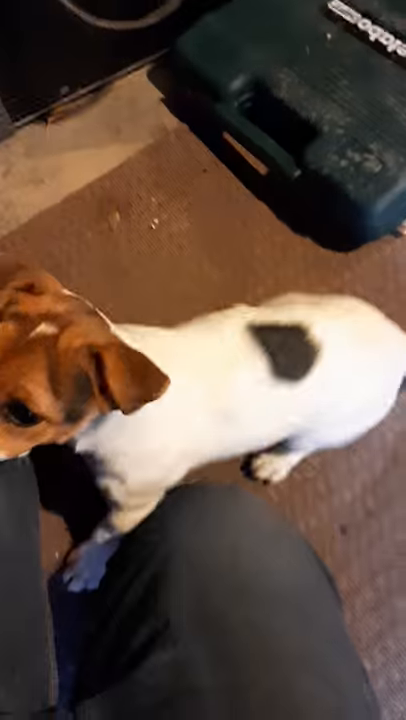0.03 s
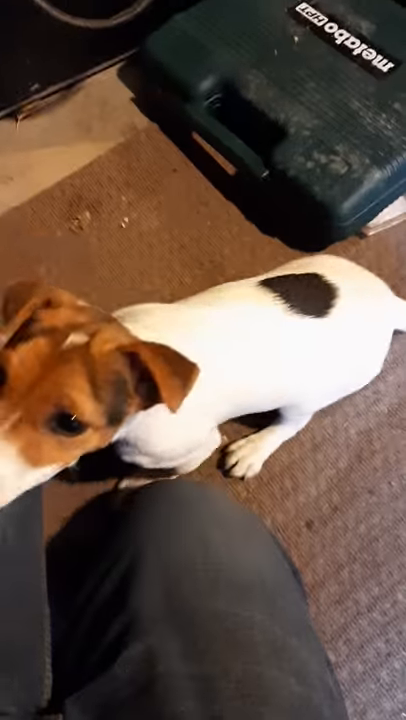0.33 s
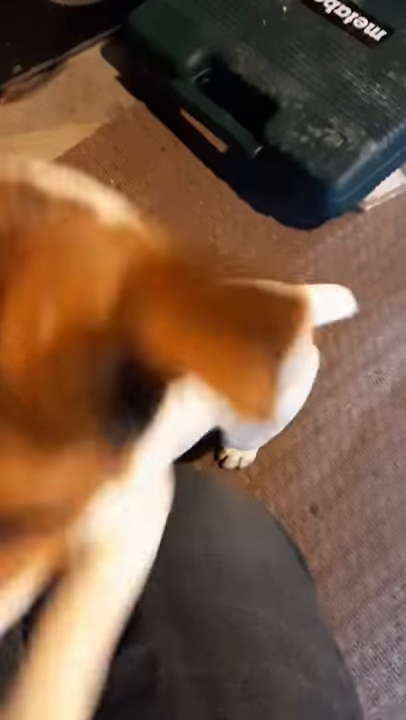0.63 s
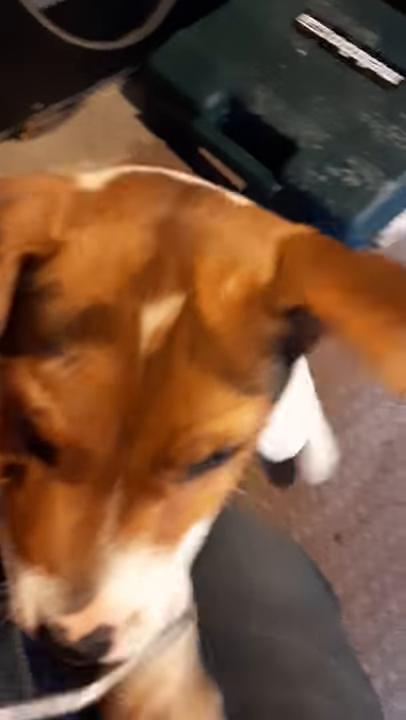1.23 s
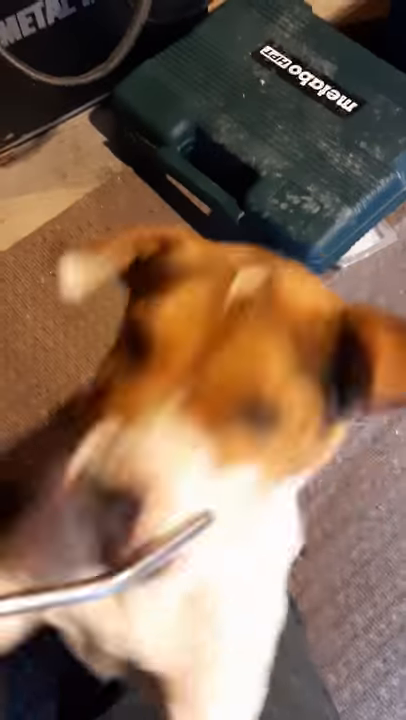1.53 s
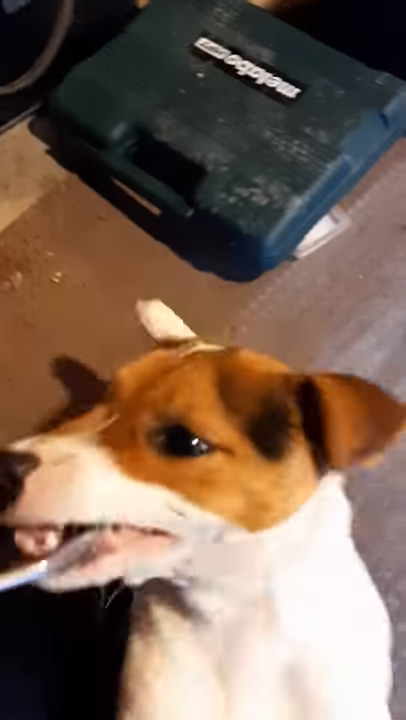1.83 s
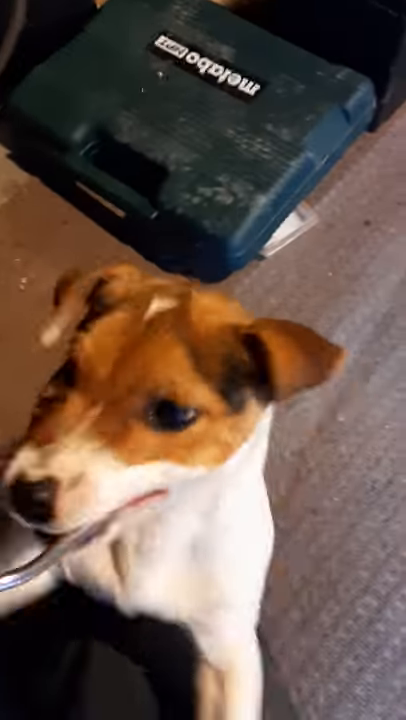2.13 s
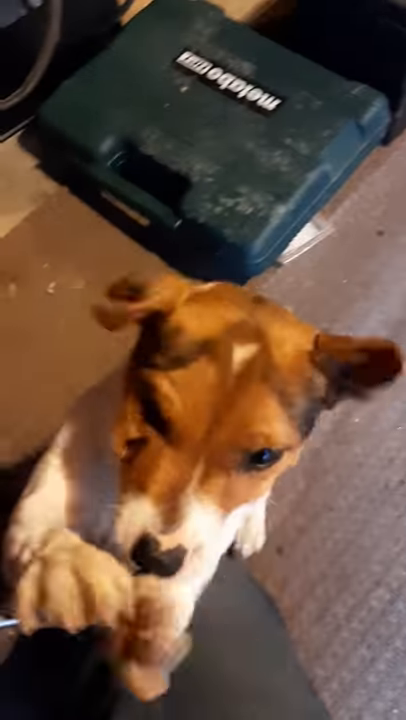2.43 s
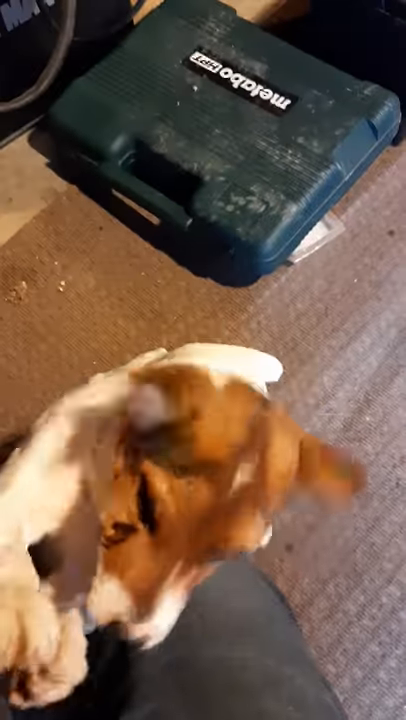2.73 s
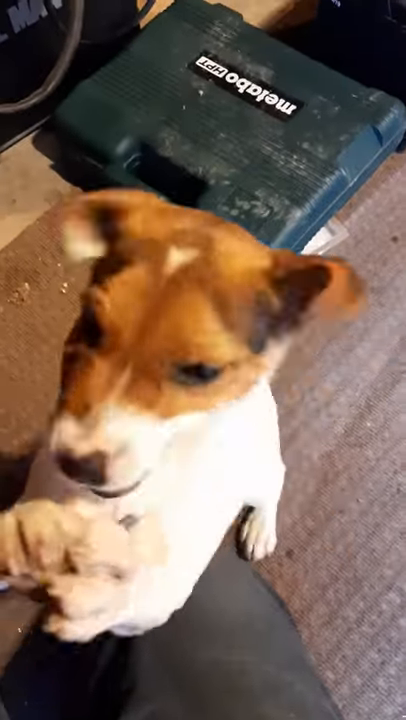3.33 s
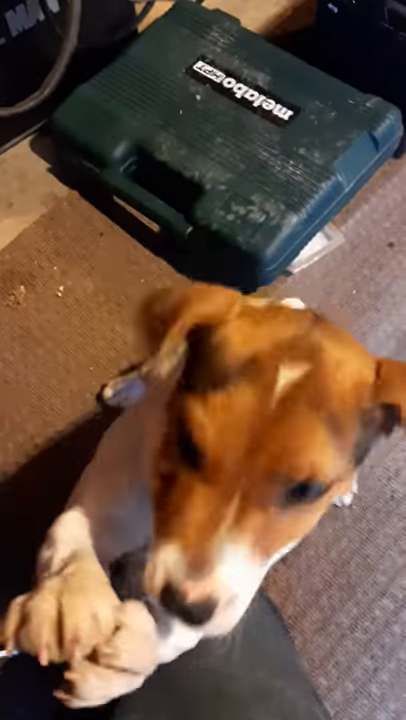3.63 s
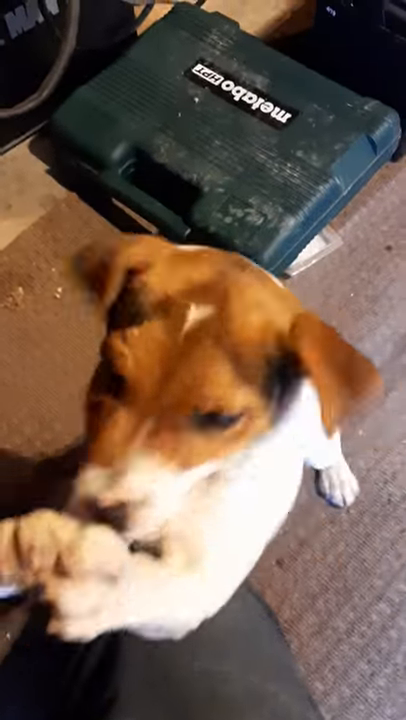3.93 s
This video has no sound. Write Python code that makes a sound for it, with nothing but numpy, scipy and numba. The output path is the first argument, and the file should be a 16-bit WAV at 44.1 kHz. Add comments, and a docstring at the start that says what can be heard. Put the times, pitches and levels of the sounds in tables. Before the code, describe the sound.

In a workshop, an air nozzle opens with a spurt and hisses close to the microphone. The hiss grows, then flutters and spits as it strikes a dog's muzzle and paws, throwing short puffs of wind onto the microphone.

```python
"""A workshop, close to a phone: compressed air hisses from a blow gun while a dog snaps at the jet.
The valve opens with a spurt; the free jet rings the gun's thin tube and swells as the trigger is squeezed.
Then it splashes on muzzle and paws, blows the open mouth like a bottle, spatters saliva and is thrown
across the two microphone ports in short blasts. Nearby surfaces throw the hiss back over a faint rush."""
import sys
import numpy as np
from scipy import signal
from scipy.fft import rfft, irfft
from scipy.io import wavfile
from scipy.ndimage import uniform_filter1d
from numba import njit

SR = 44100
rng = np.random.default_rng(int(sys.argv[2]) if len(sys.argv) > 2 else 0)


def inscribe(sig):
    """Save sig as 16-bit PCM at rate SR to the path in sys.argv[1].

    A 1-D sig is mono; a 2-D sig holds one channel per row.
    Samples are clipped to [-1, 1] before scaling.
    """
    pcm = np.round(np.clip(np.atleast_2d(sig).T, -1, 1) * 32767)
    wavfile.write(sys.argv[1], SR, pcm.astype(np.int16))


N = 176400

# Ride of the free jet: time_s, level_db, treble_db, tube_ring_db
JET_RIDE = [(.07,-43.5,-2,-2),(.155,-53,-6,7),(.2,-43.5,0,-4.5),(.29,-48,3,-5.5),(.52,-47.5,1,-4),(.68,-43,-1,-6),(.77,-45.5,-8,6.5),(.81,-37.5,-3.5,1),(.99,-34.5,-8,-1.5),(1.08,-32,-5,2),(1.22,-30,-0.5,-0.5),(1.4,-30.5,4,2),(1.52,-24.5,-2,3.5),(1.6,-28.5,12.5,-12),(1.7,-42,6,7.5),(2.25,-38.5,8,0),(2.75,-42,6,-1),(3.3,-37.5,6.5,2),(4.0,-53.5,28,0.5)]
# Resonances of the tube: pitch_hz, width_hz, running_db, spurt_db
TUBE_MODES = [(1516,127,4,-17),(2620,210,2,-8.5),(3750,140,6,7),(4925,250,5.5,-1.5),(5860,190,1.5,1),(6900,190,3,-1.5),(8050,200,0.5,-31),(9380,200,-4,-20),(10600,270,-7.5,-17),(11830,310,-4,-15),(12500,430,2,-22),(14040,530,3.5,-22),(14930,560,3.5,-23)]
# Rush of the jet between those resonances: frequency_hz, gain_db
JET_EQ = [(40,-27.5),(350,-20),(750,-11.5),(1100,-10.5),(1900,-7),(3200,-5.5),(5300,-1),(7700,-3),(8700,-29),(10000,-12),(11200,-1),(12500,-40),(15700,-15)]
# Hollow puff of the opening valve: pitch_hz, width_hz, gain_db
VALVE_PUFF = [(388,170,-19)]
# Ride of the jet striking the dog: time_s, relative_level_db, treble_db
STRIKE_RIDE = [(1.46,-56,3),(1.54,-36,-5),(1.58,-30,4),(1.615,-24.5,6),(1.645,-17.5,0.5),(1.672,-36,7.5),(1.755,-31,4.5),(1.782,-23.5,-4),(1.795,-31,-8),(1.9,-26,4.5),(2.0,-22.5,-7),(2.04,-28,3.5),(2.18,-26.5,4.5),(2.26,-33,-2),(2.32,-28,-2),(2.365,-25,4),(2.39,-28,-6),(2.46,-32,7),(2.5,-31.5,3.5),(2.594,-32,1),(2.6,-25,6.5),(2.62,-28.5,9.5),(2.655,-31,-3),(2.68,-30,5.5),(2.768,-32,4.5),(2.79,-24.5,8.5),(2.818,-24,4),(2.828,-32,2),(2.838,-31,-2),(2.843,-23.5,7),(2.9,-27,10.5),(2.97,-25.5,3.5),(3.025,-23.5,7),(3.085,-30,3.5),(3.125,-27.5,7),(3.187,-28,5),(3.2,-23,0),(3.23,-23,2),(3.275,-25.5,1),(3.29,-26,1),(3.34,-33.5,0.5),(3.418,-25,-5),(3.435,-23,3),(3.495,-24,1),(3.56,-27.5,-7),(3.65,-28,2.5),(3.695,-29,1),(3.74,-25.5,5.5),(3.79,-26,3),(3.85,-24,0),(3.895,-29.5,3),(4.0,-23,-16)]
# Air splashing off the dog, as each port hears it: frequency_hz, left_db, right_db
SPLASH_EQ = [(30,-1,-29),(90,-12,-9),(404,-7,-7.5),(900,-3,0.5),(1840,3.5,3),(3020,-0.5,0.5),(3980,2.5,4.5),(4550,0,-0.5),(5700,4,6),(6400,-0.5,1.5),(7890,4.5,6),(8210,-15.5,-1),(9700,-19,1),(11000,4.5,5),(12400,-8.5,4.5),(13500,-5.5,4),(15900,-0.5,9.5)]
# Mouth cavity following the jaw: time_s, pitch_hz, level_db
MOUTH_RIDE = [(1.5,1610,-66),(1.6,1700,-59),(1.645,1830,-32),(1.68,1800,-62),(1.805,1410,-46),(1.825,1190,-31),(1.85,1065,-23.5),(1.91,910,-33),(1.95,870,-28.5),(1.98,916,-21),(2.015,930,-30),(2.06,940,-35),(2.1,1990,-55),(2.19,2060,-23),(2.27,1950,-47),(2.33,2130,-27),(2.39,1810,-47),(2.44,1320,-34),(2.55,1670,-43),(2.66,1480,-36.5),(2.77,1780,-38.5),(2.8,1630,-25),(2.87,1700,-36.5),(2.93,1780,-30.5),(3.05,1540,-36.5),(3.108,1660,-20),(3.13,1600,-38),(3.28,1740,-37),(3.34,1460,-46),(3.39,1580,-26),(3.5,1650,-46),(3.69,1860,-36.5),(3.78,1420,-35),(3.815,1150,-25),(3.86,1540,-33),(3.92,1880,-42),(4.0,1550,-38)]
# Mouth resonances with the nozzle between the jaws: pitch_hz, width_hz, gain_db
BITE_MODES = [(426,230,-6.5),(2070,220,3),(3570,650,6.5),(4760,390,2),(5860,770,3),(7730,650,6),(11000,610,-0.5),(13700,970,3.5)]
# Flaring bands of hiss: peak_s, half_length_s, pitch_hz, width_hz, level_db
HISS_FLARES = [(1.1,0.081,4900,450,-38),(1.404,.06,15100,450,-34),(1.335,.04,2560,160,-41),(1.477,0.03,3660,406,-33),(1.534,0.022,2840,900,-29.5),(1.542,0.045,12300,1000,-34),(1.626,0.018,2170,695,-30.5),(1.625,0.038,6140,1500,-24.5),(1.72,0.039,5950,1500,-34),(1.804,.018,7200,700,-24),(1.793,0.0099,12500,2000,-29),(2.168,.035,7800,500,-29.5),(2.175,0.028,3260,400,-26),(2.3,0.01,10000,900,-30.5),(2.323,0.037,5040,2200,-28),(2.482,0.042,5470,500,-35),(2.92,0.036,5440,1200,-29.5),(2.962,0.038,9700,1100,-24.5),(2.995,0.05,7400,600,-24),(2.99,.11,1970,278,-37),(3.05,0.25,1540,90,-38.5),(3.102,0.014,1900,900,-26.5),(3.127,0.019,6960,3500,-24),(3.276,.018,14900,800,-22),(3.391,.03,1610,450,-32),(3.435,0.0091,5220,450,-20),(3.453,0.011,7050,700,-27),(3.56,0.039,11800,1100,-30.5),(3.663,.04,14100,1100,-29),(3.743,.025,12000,800,-31),(3.85,0.032,14200,1400,-22),(3.974,0.06,13500,2300,-25.5)]
# Tooth or claw cutting the jet: start_s, level_db
JET_CUTS = [(1.656,-18),(1.7605,-11.5),(1.999,-16),(2.049,-17),(2.239,-18.5),(2.598,-27),(2.651,-26),(2.68,-24),(2.924,-28),(3.197,-21),(3.431,-22),(3.525,-15),(3.58,-15.5),(3.744,-17),(3.85,-16)]
# Tone of a cut: frequency_hz, gain_db
CUT_EQ = [(200,-15),(1200,4),(4000,1),(7500,-13),(9000,-11),(12000,-3),(15500,-1)]
# Blasts across the ports: start_s, half_length_s, left_db, right_db, relative_push_db
PORT_BLASTS = [(1.638,0.005,-22,-23,-2),(1.656,0.0035,-24.5,-25.5,5),(1.759,0.004,-17.5,-17.5,-4),(1.773,0.006,-20,-28.5,3.5),(2.15,0.0054,-35,-15.5,6),(2.237,0.0059,-29,-20,-3),(2.593,0.0057,-45,-32,2),(2.637,0.026,-26,-37.5,-16),(2.783,0.015,-22.5,-33,-24),(2.846,0.019,-23,-29,-17),(2.902,0.0026,-34,-10,-0.5),(3.194,0.0091,-26.5,-34,-14),(3.272,0.0068,-18.5,-21,-12),(3.471,0.0076,-24,-37,-12),(3.477,0.0073,-19,-36,-14),(3.523,0.0092,-24.5,-19,-18),(3.577,0.0069,-16,-23,-8),(3.708,0.024,-27,-35,-12),(3.745,0.0099,-30,-14.5,-5),(3.846,0.009,-19,-12,-10),(3.863,0.015,-34,-27.5,-10),(3.987,.012,-27,-17.5,-16)]
# Turbulence on a port: frequency_hz, gain_db
BUFFET_EQ = [(20,-6),(60,-0.5),(130,1.5),(220,0),(400,-5.5),(700,-5),(1500,-12),(3000,-11),(6000,-33),(16000,-55)]
# Spent air round the phone: frequency_hz, gain_db
WASH_EQ = [(25,-14),(70,0),(140,-1),(220,-0.5),(380,-7),(600,-5),(1500,-12),(8000,-50)]
# Low draughts on the right port: peak_s, half_length_s, level_db
DRAUGHT_SWELLS = [(.208,.012,-62),(0.773,0.065,-41.5),(0.85,0.081,-40.5),(1.135,0.013,-54),(1.565,.02,-41),(3.93,0.054,-36.5)]
# Rumble of a draught: frequency_hz, gain_db
DRAUGHT_EQ = [(20,-9),(45,-7),(65,6),(110,-10.5),(250,-23.5),(800,-22.5),(4000,-35)]
# Body of a soft knock: pitch_hz, width_hz, gain_db
KNOCK_MODES = [(150,130,2),(450,250,-8),(990,290,4)]
# Steady room tone: frequency_hz, gain_db
ROOM_EQ = [(30,4),(70,6),(130,-4),(260,-1),(700,-12),(1100,-1.5),(1500,-2.5),(2200,-6),(5000,-16),(16000,-37)]

OPEN_S, OPEN_RISE_S = 0.068, 0.0028
SPURT_DB, SPURT_HOLD_S, SPURT_DECAY_S = -36, 0.077, 0.067
JET_LOW_PAN_DB, JET_LOW_HZ = -8, 1210
BITE_START_S, BITE_END_S, BITE_RAMP_S, BITE_DB = 1.77, 2.23, 0.017, -22
DROPS_PER_S, DROP_DECAY_S, CUT_DECAY_S = 45, 0.00037, 0.0017
PUSH_HZ, PUSH_DECAY_S, BLAST_RISE_S = 68, 0.0066, 0.00045
KNOCK_S, KNOCK_DECAY_S = 0.18, 0.025
WALLS_DB, WALLS_T60_S, WALLS_DULL_HZ = -8, 0.09, 8000
PORT_SHARE, PORT_SHARE_HZ = 0.39, 8500
TREBLE_HZ, TOP_HZ = 8660, 15780


def free_jet():
    """The running jet rings the thin tube, with a broad rush between the resonances."""
    ring_eq, rush_eq = peaks(np.array(TUBE_MODES)[:, :3]), slope(JET_EQ)
    ring = flutter(colour(air(), ring_eq), depth_db=3.1, rate_hz=11.57, bands=24)
    ring *= undb(ride(JET_RIDE, 3))
    low_pan = pan(JET_LOW_PAN_DB / (1 + (freqs() / JET_LOW_HZ) ** 2))
    rush = colour(air(), rush_eq * low_pan)
    ring_share = np.sum(ring_eq ** 2) / np.sum(ring_eq ** 2 + rush_eq ** 2)
    jet = np.sqrt(ring_share) * ring + np.sqrt(1 - ring_share) * rush
    return brighten(jet, ride(JET_RIDE, 2)) * undb(ride(JET_RIDE, 1) + 0.68 * wobble(30.4))


def blow_gun():
    """The valve opens: a hollow spurt rings the tube and dies away while the jet runs on."""
    age = times() - OPEN_S
    jet = free_jet()
    spurt_modes = np.array(TUBE_MODES)[:, [0, 1, 3]]
    spurt = colour(air(), peaks(spurt_modes) + peaks(VALVE_PUFF))
    spurt *= undb(SPURT_DB) * np.exp(-np.maximum(age - SPURT_HOLD_S, 0) / SPURT_DECAY_S)
    return (jet + spurt) * np.clip(age / OPEN_RISE_S, 0, 1) * pan(-2.5)


def strike_level():
    """How hard the jet hits the dog, as a gain that fades in at first contact."""
    fade_in = np.clip((times() - STRIKE_RIDE[0][0]) / 0.03, 0, 1)
    return undb(ride(STRIKE_RIDE, 1) + 2) * fade_in


def splash():
    """Air breaks on muzzle and paws; its bands flutter as the head moves."""
    hiss = colour(air(), np.array([slope(SPLASH_EQ, 1), slope(SPLASH_EQ, 2)]))
    hiss = flutter(hiss, depth_db=3.33, rate_hz=26, bands=30)
    return brighten(hiss, ride(STRIKE_RIDE, 2)) * strike_level() * undb(1.5 * wobble(130))


def mouth():
    """The jet blows the mouth like a bottle, its pitch following the jaw; a full bite adds resonances."""
    t = times()
    pitch_hz, width_hz = ride(MOUTH_RIDE, 1) * (1 + 0.042 * wobble(50)), 460.0
    cavity = np.array([resonate(resonate(port, pitch_hz, width_hz), pitch_hz, width_hz) for port in air()])
    cavity = unit(cavity) * undb(ride(MOUTH_RIDE, 2) + 1.94 * wobble(90)) * (t > MOUTH_RIDE[0][0])
    held = np.clip(np.minimum(t - BITE_START_S, BITE_END_S - t) / BITE_RAMP_S, 0, 1)
    bite = colour(air(), peaks(BITE_MODES)) * held * undb(BITE_DB + 1.06 * wobble(60))
    return cavity * pan(-4.5) + bite * pan(-2)


def flares():
    """Bands of hiss flare as the jet rings the tube or catches lip, tooth or claw."""
    turbulence = air()
    shrill = sum(colour(turbulence, peaks([(hz, width, 0)])) * swell(peak_s, half_s) * undb(db)
                 for peak_s, half_s, hz, width, db in HISS_FLARES)
    return shrill * undb(1.9 * wobble(120)) * pan(-6)


def saliva():
    """Droplets of saliva tick in the jet, louder the harder it strikes."""
    drops = rng.random(N) < DROPS_PER_S / SR
    clicks = drops * undb(-8 * np.minimum(rng.exponential(size=N), 3))
    decay = np.exp(-np.arange(256) / SR / DROP_DECAY_S)
    grains = rng.standard_normal((2, len(decay))) * decay
    ticks = np.array([signal.fftconvolve(clicks, grain)[:N] for grain in grains])
    return colour(ticks, peaks([(3600, 2200, 0)])) * undb(-23.5) * strike_level()


def jet_cuts():
    """Tooth or claw cuts the jet for an instant, and it spits sharply."""
    t = times()
    bursts = sum(undb(db) * (t >= at) * np.exp(-abs(t - at) / CUT_DECAY_S) for at, db in JET_CUTS)
    return colour(air(), slope(CUT_EQ)) * bursts * pan(-5)


def blasts():
    """Deflected air hits each port: a low push of pressure and a spiky burst of turbulence."""
    ports = np.zeros((2, N))
    buffet = colour(rng.standard_normal((2, N)), slope(BUFFET_EQ))
    spikes = undb(5.5 * np.clip(wobble(450), -2, 1))
    buffet = unit(buffet * spikes) * undb(-3)
    for start_s, half_s, left_db, right_db, push_db in PORT_BLASTS:
        age = np.maximum(times() - start_s, 0)
        push = -np.sin(2 * np.pi * PUSH_HZ * age) * np.exp(-age / PUSH_DECAY_S) * undb(push_db)
        burst = np.minimum(age / BLAST_RISE_S, 1) * np.exp(-(age / (2 * half_s)) ** 1.74)
        ports += undb([[left_db], [right_db]]) * (buffet * burst + push)
    return ports


def wash():
    """Spent air eddies round the phone whenever the jet hits the dog."""
    eddies = colour(rng.standard_normal((2, N)), slope(WASH_EQ))
    gusts = undb(1.5 * np.array([wobble(45), wobble(45)]))
    return eddies * gusts * strike_level() * undb(-23)


def draughts():
    """Slower air rumbles on the right port and barely touches the left."""
    rumble = colour(rng.standard_normal((2, N)), slope(DRAUGHT_EQ))
    swells = sum(undb(db) * swell(peak_s, half_s) for peak_s, half_s, db in DRAUGHT_SWELLS)
    return rumble * swells * undb([[-24], [0]])


def knock():
    """A soft, dull knock near the phone."""
    age = times() - KNOCK_S
    decay = (age > 0) * np.exp(-abs(age) / KNOCK_DECAY_S)
    return colour(air(), peaks(KNOCK_MODES)) * decay * undb(-56) * pan(-12)


def walls(x):
    """Floor, knees and benches close by throw the hiss back, duller, and differently to each port."""
    age = times()[:SR // 5]
    tail = rng.standard_normal((2, len(age))) * undb(-60 * age / WALLS_T60_S) * (age > 0.003)
    tail *= undb(WALLS_DB) / np.linalg.norm(tail, axis=1, keepdims=True)
    tail = signal.sosfilt(signal.butter(1, WALLS_DULL_HZ, fs=SR, output="sos"), tail)
    return (x + signal.fftconvolve(x, tail, axes=1)[:, :N]) / np.hypot(1, undb(WALLS_DB))


def room_tone():
    """A faint, dull rush comes in with the hiss and lies under it."""
    return colour(air(), slope(ROOM_EQ)) * undb(-66.5) * pan(-8) * (times() > OPEN_S)


def air():
    """Turbulence at the two ports: partly shared, less so in the treble."""
    left, right, common = rfft(rng.standard_normal((3, N)))
    share = PORT_SHARE / (1 + (freqs() / PORT_SHARE_HZ) ** 2)
    return irfft(np.sqrt(share) * common + np.sqrt(1 - share) * np.array([left, right]), N)


def flutter(x, depth_db, rate_hz, bands):
    """Let neighbouring bands swell and sink on their own, at rms 1 overall."""
    spectrum, position = rfft(x), np.sqrt(freqs() / TOP_HZ) * (bands - 1)
    layers = (irfft(spectrum * np.maximum(1 - abs(position - k), 0), N) for k in range(bands))
    return unit(sum(layer * undb(depth_db * wobble(rate_hz)) for layer in layers))


def brighten(x, db):
    """Treble shelf with a moving boost or cut."""
    treble = irfft(rfft(x) / (1 + (TREBLE_HZ / freqs()) ** 8), N)
    return x + (undb(db) - 1) * treble


@njit
def resonate(x, pitch_hz, width_hz):
    """Swept state-variable band-pass."""
    y, band_state, low_state = np.empty(len(x)), 0., 0.
    for i in range(len(x)):
        tuning, damping = np.tan(np.pi * pitch_hz[i] / SR), width_hz / pitch_hz[i]
        band = (band_state + tuning * (x[i] - low_state)) / (1 + tuning * (tuning + damping))
        band_state = 2 * band - band_state
        low_state += 2 * tuning * band
        y[i] = damping * band
    return y


def colour(x, gain):
    """Filter by a gain per bin, to rms 1."""
    return unit(irfft(rfft(x) * gain, N))


def slope(table, column=1):
    """EQ gain per bin, joining a table's dB points over log frequency."""
    rows = np.array(table)
    return undb(np.interp(np.log(freqs()), np.log(rows[:, 0]), rows[:, column]))


def peaks(modes):
    """EQ gain per bin from rows of pitch_hz, width_hz, gain_db."""
    return sum(undb(db) / (1 + 2 * ((freqs() - hz) / width) ** 2) for hz, width, db in modes)


def ride(table, column):
    """One column of a table, joined by straight lines in time."""
    rows = np.array(table)
    return np.interp(times(), rows[:, 0], rows[:, column])


def swell(peak_s, half_length_s):
    """A bell-shaped envelope."""
    return np.exp(-((times() - peak_s) / half_length_s) ** 2)


def wobble(rate_hz):
    """Smooth random movement at rms 1."""
    hold = int(SR / rate_hz)
    steps = np.repeat(rng.standard_normal(N // hold + 1), hold)
    return unit(uniform_filter1d(steps, hold)[:N])


def pan(db):
    """Left and right gains for a level difference; negative leans right."""
    return undb(np.vstack([db, -db]) / 2)


def undb(db):
    """Decibels to gain."""
    return 10 ** (np.asarray(db) / 20)


def unit(x):
    """Scale to rms 1."""
    return x / np.sqrt(np.mean(x ** 2) + 1e-18)


def times():
    """Time of each sample in s."""
    return np.arange(N) / SR


def freqs():
    """Frequency of each spectral bin in Hz, at least 1."""
    return np.maximum(np.arange(N // 2 + 1) * SR / N, 1)


def scene():
    """Blow gun and dog in the workshop, with wind on the microphone and room tone beneath."""
    hiss = walls(blow_gun() + splash() + flares() + mouth() + saliva() + knock())
    return hiss + jet_cuts() + blasts() + wash() + draughts() + room_tone()


def record(dry):
    """The phone thins the deep bass, clips at full scale and cuts the top."""
    low_cut = signal.butter(2, 57, "high", fs=SR, output="sos")
    high_cut = signal.ellip(12, 0.2, 80, TOP_HZ, fs=SR, output="sos")
    clipped = np.clip(signal.sosfilt(low_cut, dry), -1, 1)
    return signal.sosfilt(high_cut, clipped)


dry = scene()
out = record(dry)
inscribe(out)
```